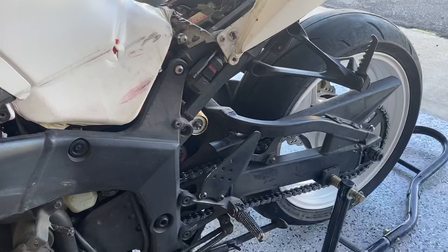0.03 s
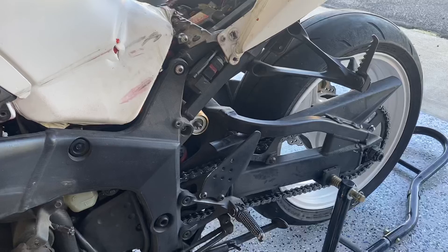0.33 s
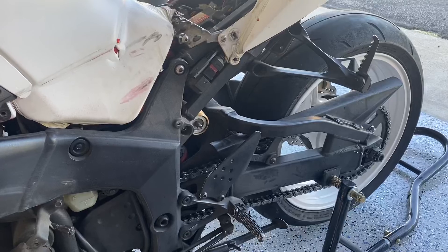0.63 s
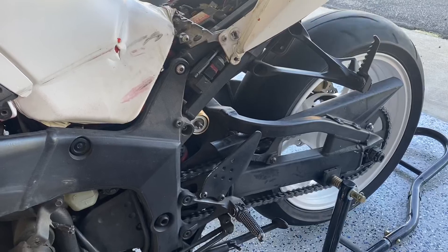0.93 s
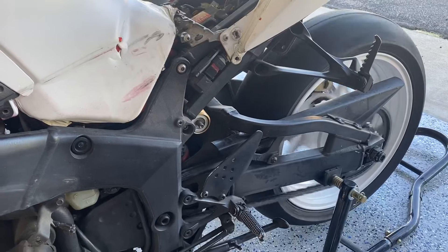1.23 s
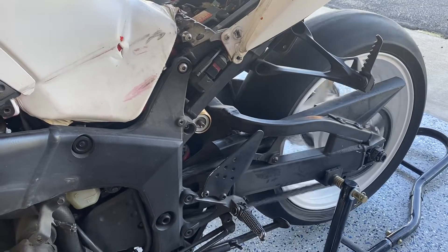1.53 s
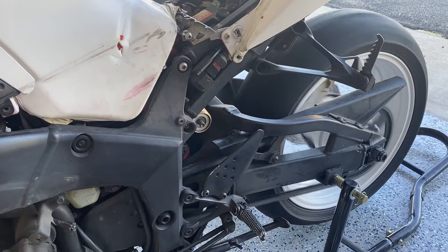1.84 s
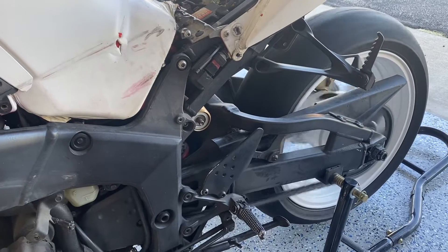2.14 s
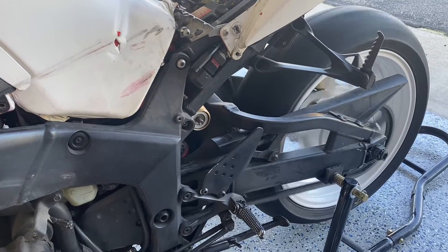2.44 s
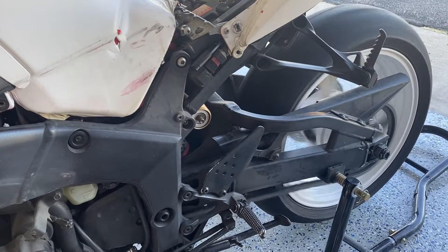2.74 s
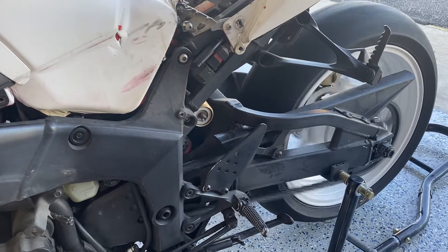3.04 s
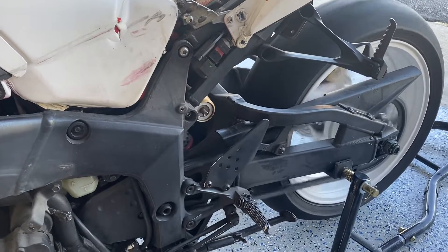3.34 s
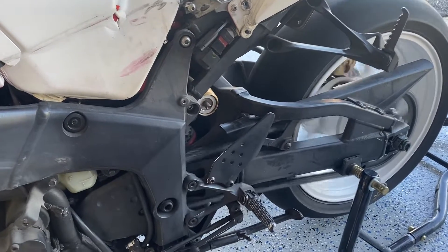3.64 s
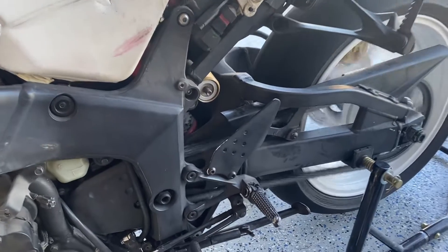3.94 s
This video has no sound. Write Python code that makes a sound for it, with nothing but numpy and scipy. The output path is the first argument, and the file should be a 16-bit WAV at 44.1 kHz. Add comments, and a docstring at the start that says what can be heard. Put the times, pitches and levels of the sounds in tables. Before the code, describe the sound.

Close motorcycle idle with a lumpy throb, sagging briefly before the chain runs and slaps.

```python
"""A four-cylinder motorcycle idles with a lope on a rear stand in an open garage, close up: exhaust
pulses ring the pipe, the valves tick and the clutch rattles. After a second the clutch takes up: the
engine sags, booms and fires more evenly while it spins up the rear wheel, and the chain starts to
run over the sprockets. By two seconds the lope is back and the clutch rattle has receded; the slack
chain slaps as the uneven engine tugs at it."""
import sys
import numpy as np
from scipy import signal
from scipy.fft import rfft, irfft
from scipy.io import wavfile
from scipy.ndimage import uniform_filter1d, minimum_filter1d

SR = 44100
rng = np.random.default_rng(int(sys.argv[2]) if len(sys.argv) > 2 else 0)


def log_audio(samples):
    """Write samples as a 16-bit WAV file to the path given in sys.argv[1]."""
    # one column per channel
    frames = np.atleast_2d(samples).T
    # limit to full scale, then quantise
    limited = np.clip(frames, -1, 1)
    pcm = np.round(limited * 32767).astype(np.int16)
    wavfile.write(sys.argv[1], SR, pcm)


N = 176400
T = np.arange(N) / SR
HZ = np.fft.rfftfreq(16384, 1 / SR)

# the idle's limp, a row per firing over two engine cycles (delay at no load [ms], level at full load [dB])
LOPE = [(3.5, 1), (1.15, -6.3), (1.1, .9), (-.45, -3.5), (-.55, -4.3), (.95, -.3), (1.1, -4), (4.5, .8)]
FIRINGS_PER_CYCLE, IN_GEAR_S = 4, 1.5


def amp(db):
    """Decibels to gain."""
    return 10 ** (np.asarray(db) / 20)


def unit(x):
    """Scales to rms 1."""
    return x / np.sqrt(np.mean(x ** 2) + 1e-20)


def curve(points):
    """Draws an envelope through breakpoints in time."""
    return np.interp(T, *np.transpose(points))


def spectrum(points, hz=HZ):
    """Draws a curve through breakpoints in log frequency."""
    f, value = np.transpose(points)
    return np.interp(np.log(hz + 1), np.log(f + 1), value)


def resonances(table):
    """Bell-shaped peaks and notches, in dB on the grid HZ."""
    return sum(db / (1 + (2 * (HZ - f) / width) ** 2) for f, width, db in table)


def colour(x, db):
    """Minimum-phase equaliser with the given gain on the grid HZ."""
    log_gain = np.log(amp(np.maximum(db, db.max() - 100)))
    mirrored = np.r_[log_gain, log_gain[-2:0:-1]]
    taps = np.fft.ifft(np.exp(np.conj(signal.hilbert(mirrored)))).real[:len(HZ)]
    return signal.fftconvolve(x, taps[None], axes=1)[:, :N]


def garage(x, wet_db, t60_s=0.19):
    """The walls add a short diffuse tail, different left and right."""
    t = T[:SR // 2]
    tail = rng.standard_normal((2, len(t))) * amp(-60 * t / t60_s) * (t > .004)
    tail /= np.linalg.norm(tail, axis=1, keepdims=True)
    return x + amp(wet_db) * signal.fftconvolve(x, tail, axes=1)[:, :N]


def lope_place(count, t):
    """Position in the lope, in firings; it skips one engine cycle once in gear."""
    return (count + FIRINGS_PER_CYCLE * (t > IN_GEAR_S)) % len(LOPE)


def firings(count, load, travel_s=.009, stumble_s=.025, puff_s=.022, puff_db=-16):
    """Each firing gives a pressure pulse and a puff of turbulent gas; load evens out the lope."""
    # stumbles, where a few firings in a row come out weak (time [s], level [dB])
    stumbles = [(1.038, -5), (2.105, -0.5), (2.781, 0)]
    number = np.arange(2, int(count[-1]))
    at = np.interp(number, count, T)
    strain = np.interp(at, T, load)
    delay_ms, lope_db = np.array(LOPE)[lope_place(number, at).astype(int)].T
    # a labouring engine scatters more from firing to firing
    scatter = rng.standard_normal((len(number), 2)).T * (1 + .5 * strain)
    jitter_ms, spread_db = .2 * scatter[0], .9 * scatter[1]
    at = at - travel_s + ((1 - strain) * delay_ms + jitter_ms) / 1000  # early by the trip down the pipe
    stumble_db = sum(dip * np.exp(-((at - time) / stumble_s) ** 2) for time, dip in stumbles)
    size = amp(stumble_db + (2 - strain) * lope_db - 2 * strain + spread_db)
    onsets = np.clip(np.round(at * SR), 0, N - 1).astype(int)
    pulses = np.bincount(onsets, size, N)
    puff = np.exp(-T[:SR // 10] / puff_s)
    gas = signal.fftconvolve(pulses, puff / np.linalg.norm(puff))[:N] * rng.standard_normal(N)
    return pulses + amp(puff_db) * gas


def exhaust(count, load, bass_hz=141, loaded_bass_db=-7):
    """The pulses ring the pipe, bounce in the silencer and reach left and right slightly apart."""
    # overall tone of the silencer (frequency [Hz], gain [dB])
    muffler = [(15, -44), (30, -11.5), (48, -12), (80, -10.5), (125, -2.5), (215, -3), (300, -6),
               (380, -12), (455, -13), (520, -38.5), (700, -65.5), (1200, -60.5)]
    # resonances and notches of the pipe (frequency [Hz], width [Hz], lift [dB])
    pipe = [(68, 6.3, 8.5), (101.2, 12.7, -14.5), (118.3, 16.3, 8.5), (131.8, 12.4, 7), (170.7, 21.7, -14),
            (210.6, 21.3, 8.5), (228, 21.7, 6.5), (252.8, 14.5, -9), (260.86, 5, 18), (378.5, 26.4, 10.5)]
    # silencer chambers that smear each pulse (round trip [ms], reflection [-1..1])
    chambers = [(3.23, -.38), (5.94, .13)]
    # how far the left channel runs ahead of the right (frequency [Hz], phase [rad])
    left_lead = [(60, -.1), (110, 0.51), (145, -0.44), (230, -0.5), (260, -0.19), (285, -0.83),
                 (450, -0.97)]
    # exhaust fader (time [s], level [dB])
    fader = [(0, -13.5), (.98, -13.5), (1.2, -11), (1.8, -11.5), (2.1, -14), (3, -12), (4, -13)]
    ringing = colour(firings(count, load)[None], spectrum(muffler) + resonances(pipe))
    bins = rfft(ringing, 2 * N)
    hz = np.fft.rfftfreq(2 * N, 1 / SR)
    for ms, reflection in chambers:
        trip = np.exp(-2j * np.pi * hz * ms / 1000)
        bins = bins * (trip - reflection) / (1 - reflection * trip)
    lead = spectrum(left_lead, hz)
    bins = bins * np.exp(.5j * np.array([lead, -lead]))
    # under load the ragged bass ducks as the boom takes over
    bass = irfft(bins / (1 + (hz / bass_hz) ** 10))[:, :N]
    stereo = irfft(bins)[:, :N] - bass * (1 - amp(loaded_bass_db * load))
    return unit(garage(stereo, wet_db=-19)) * amp(curve(fader))


def clatter(tone, grain_db, ring, clicks_per_s=5000, low_cut_hz=177):
    """Dense metal clicks of uneven size ring the frame, in stereo at rms 1."""
    # modes of sprocket, guard and swingarm (frequency [Hz], width [Hz], lift at ring = 1 [dB])
    modes = [(572, 30, 6), (811, 38, 5), (1171, 45, 11), (1745, 45, 8.5), (2070, 130, 6), (2530, 60, 5),
             (3620, 90, 5), (3887, 90, 6), (4446, 65, 6), (5000, 120, 5), (6050, 150, 4)]
    # likeness of left and right (frequency [Hz], correlation [-1..1])
    likeness = [(300, 1), (600, 0.83), (1100, 0.076), (2200, 0.58), (4000, 0.71), (5600, 0.44),
                (11000, -0.17)]
    sizes = amp(grain_db * np.minimum(rng.exponential(1, (2, N)), 5))
    clicks = sizes * rng.choice([-1, 1], (2, N)) * (rng.random((2, N)) < clicks_per_s / SR)
    correlation = np.clip(spectrum(likeness), -.95, .95)
    low_cut_db = 20 * np.log10(1 + (low_cut_hz / (HZ + 10)) ** 2)
    db = spectrum(tone) + ring * resonances(modes) - low_cut_db
    mid = colour(clicks[:1], db + 10 * np.log10(1 + correlation))[0]
    side = colour(clicks[1:], db + 10 * np.log10(1 - correlation))[0]
    return unit(np.array([mid + side, mid - side]))


def valves(count, level_db=-33):
    """Valve gear ticks and gas hisses, swelling with every firing."""
    # tone of the ticking and hiss, with a narrow gap in the treble near 9 kHz
    # that is not the valves' own (frequency [Hz], gain [dB])
    tone = [(300, -12.5), (550, 0.5), (800, 6.5), (1150, 4.5), (1500, -1.5), (2300, -1), (3700, -6),
            (4700, -10), (5900, -9.5), (9000, -25.5), (11000, -13), (16000, -35)]
    swell = 1 + 0.14 * np.cos(2 * np.pi * count)
    return amp(level_db) * unit(swell) * clatter(tone, grain_db=0.5, ring=0.72)


def clutch(count, load, level_db=-29, weak_db=-3, in_gear_db=-3.5):
    """The unloaded clutch rattles once per engine cycle, strong and weak in turn, softer in gear."""
    # bright tone of the rattle (frequency [Hz], gain [dB])
    tone = [(500, -9), (1400, 14.5), (3400, 12), (4700, 1), (6000, 9), (8500, -6.5), (16000, -1.5)]
    centre, width = 1.75, 0.63  # in firings
    place = lope_place(count, T)
    burst = np.exp(-((place % FIRINGS_PER_CYCLE - centre) / width) ** 2 / 2)
    db = level_db + weak_db * (place > FIRINGS_PER_CYCLE) + in_gear_db * (T > IN_GEAR_S)
    return amp(db) * burst * (1 - load) * clatter(tone, grain_db=4.5, ring=1.0)


def boom(count, load):
    """Even, loaded firing makes a smooth drone on the firing rate and its odd multiples."""
    # partials of the drone (multiple of the firing rate, level at full load [dB])
    partials = [(1, -21.5), (3, -54), (5, -25)]
    return load * sum(amp(db) * np.cos(2 * np.pi * multiple * count) for multiple, db in partials)


def chain(count, links_per_firing=5, flutter_db=.85):
    """Rollers seat on the sprockets at a rate tied to the engine; the tension flutters."""
    # chain fader, rising as the wheel spins up (time [s], level [dB])
    fader = [(1.05, -70), (1.33, -44), (1.39, -34), (1.52, -35.5), (1.64, -30), (1.75, -35.5), (1.86, -30),
             (1.93, -36.5), (2.1, -32.5), (2.7, -30), (4, -30)]
    # tone of the running chain, with a narrow gap in the treble near 9 kHz
    # that is not the chain's own (frequency [Hz], gain [dB])
    tone = [(250, -11), (550, 4), (900, 3), (1200, 0.5), (1500, 0.5), (2100, -1.5), (2900, -7.5),
            (3900, -5.5), (5200, -9.5), (7700, -14.5), (9000, -36.5), (11000, -13), (16000, -30)]
    links = 1 + 0.074 * np.cos(2 * np.pi * links_per_firing * count)
    flutter = unit(uniform_filter1d(rng.standard_normal(N), size=1100))
    return amp(curve(fader) + flutter_db * flutter) * unit(links) * clatter(tone, grain_db=3, ring=0.92)


def slaps(attack_s=.007, jingle_lift_db=2.5):
    """Slack chain drags over the guide: short bursts of knocks with a bright jingle."""
    # chain slaps (time [s], level [dB], decay [s], jingle against knock before its lift [dB])
    hits = [(1.776, -36, 0.013, 1), (2.012, -23.5, 0.046, -19), (2.18, -22.5, 0.044, -16),
            (2.399, -22.5, 0.021, -13), (2.567, -12.5, 0.0081, -23), (2.717, -27, 0.012, -11),
            (2.881, -21, 0.04, -15), (3.067, -20, 0.026, -20), (3.244, -25, 0.032, -14),
            (3.546, -18, 0.043, -20), (3.627, -27, .025, -15), (3.704, -20, 0.058, -22),
            (3.791, -23.5, 0.021, -18), (3.883, -20.5, 0.047, -18)]
    # dull body of a slap (frequency [Hz], gain [dB])
    knock_tone = [(200, 7), (550, -6.5), (950, -3.5), (1250, -10), (1500, -9.5), (1900, -14.5), (3000, -15),
                  (6000, -27.5), (16000, -77)]
    # bright top of a slap (frequency [Hz], gain [dB])
    jingle_tone = [(1000, -44), (2500, 8.5), (4000, 1), (6000, 12.5), (8500, 1), (12000, 10), (16000, -93)]
    knock, jingle = np.zeros((2, N))
    for start, db, decay_s, jingle_db in hits:
        age = np.maximum(T - start, 0)
        burst = amp(db) * np.minimum(age / attack_s, 1) * np.exp(-(age / decay_s) ** 2)
        knock += burst
        jingle += burst * amp(jingle_db + jingle_lift_db)
    body = knock * clatter(knock_tone, grain_db=1, ring=1.18, clicks_per_s=1200)
    return body + jingle * clatter(jingle_tone, grain_db=1, ring=0.2)


def scene():
    """Mixes exhaust, boom and metalwork, driven by engine speed and load."""
    # engine speed, sagging as the clutch bites (time [s], firing rate [Hz])
    speed = [(0.0, 48.47), (0.35, 49.95), (0.55, 47.65), (0.75, 48.85), (0.97, 48.95), (1.09, 35.94),
             (1.2, 39.66), (1.33, 39.4), (1.5, 40.99), (1.7, 42.41), (1.9, 43.9), (2.15, 45.57),
             (2.35, 46.65), (2.55, 47.05), (2.95, 48.38), (3.45, 47.87), (4.0, 49.01)]
    # load of spinning up the wheel (time [s], load [0..1])
    wheel_load = [(1.0, 0.15), (1.12, .85), (1.68, 0.86), (2.05, 0.16)]
    count = 1.17 + np.cumsum(curve(speed)) / SR  # running count of firings
    load = curve(wheel_load)
    metal = valves(count) + clutch(count, load) + chain(count) + slaps()
    return exhaust(count, load) + boom(count, load) + garage(metal, wet_db=-7)


def record(dry, ceiling=.92, start_s=.072, top_hz=15900):
    """The sound cuts in after an instant; a limiter rounds off the hardest firings, a low-pass the top."""
    held_peak = -minimum_filter1d(-abs(dry).max(0), size=SR // 100)
    peak = uniform_filter1d(held_peak, size=SR // 200)
    limited = dry / (1 + (peak / ceiling) ** 4) ** (1 / 4)
    low_pass = signal.firwin(511, top_hz, window=("kaiser", 9), fs=SR)
    return signal.oaconvolve(limited * (T > start_s), low_pass[None], "same")


dry = scene()
out = record(dry)
log_audio(out)
```